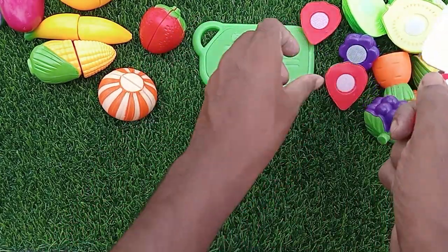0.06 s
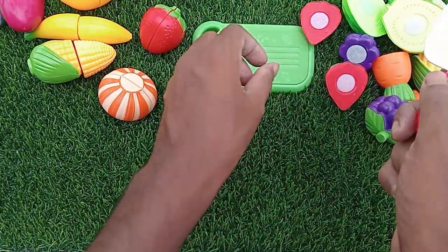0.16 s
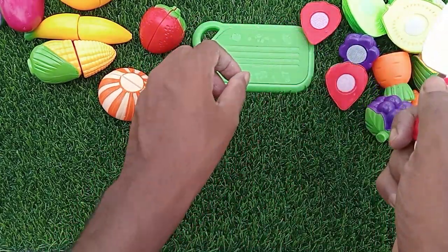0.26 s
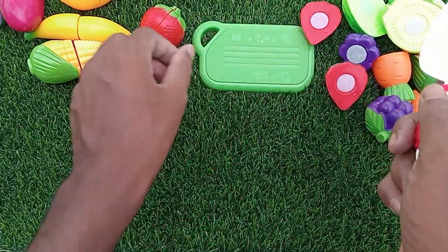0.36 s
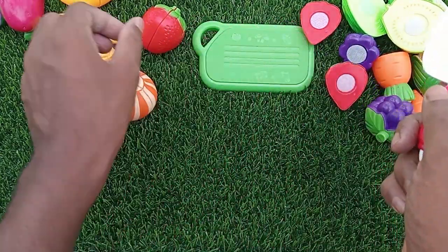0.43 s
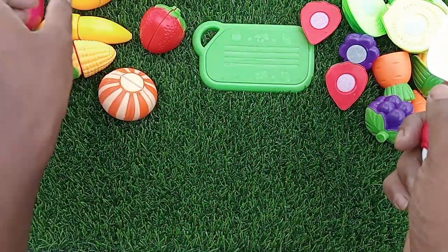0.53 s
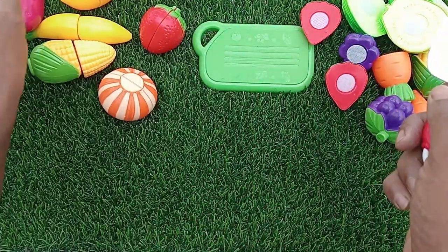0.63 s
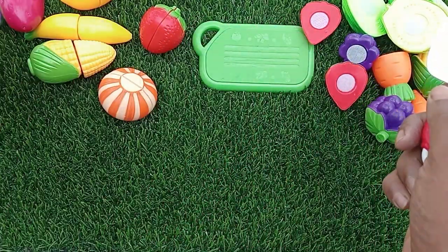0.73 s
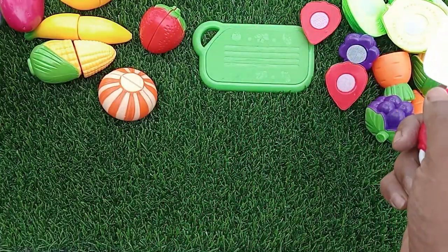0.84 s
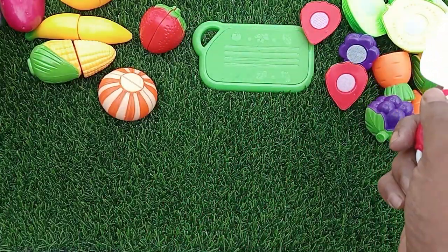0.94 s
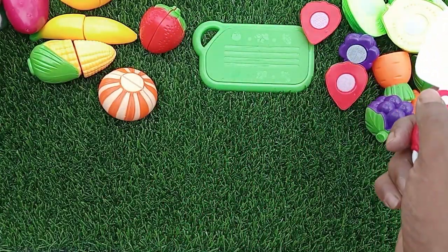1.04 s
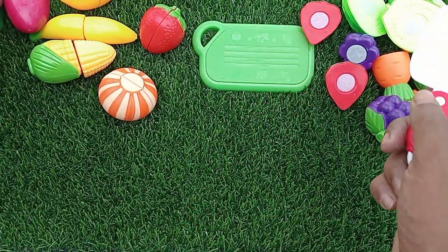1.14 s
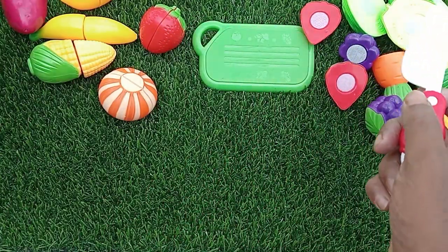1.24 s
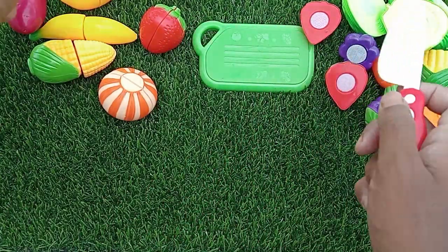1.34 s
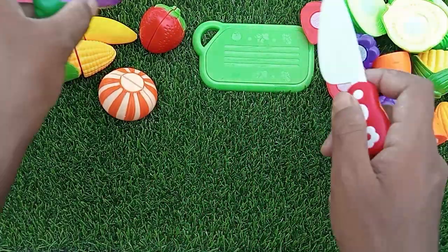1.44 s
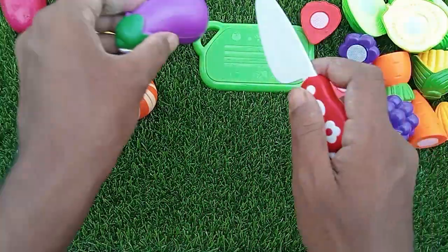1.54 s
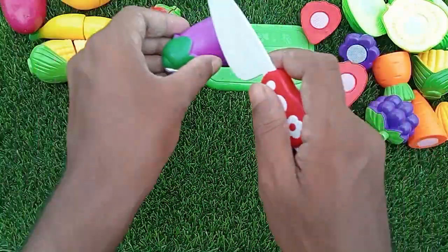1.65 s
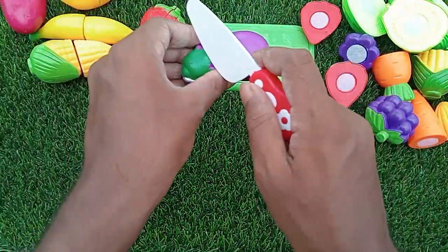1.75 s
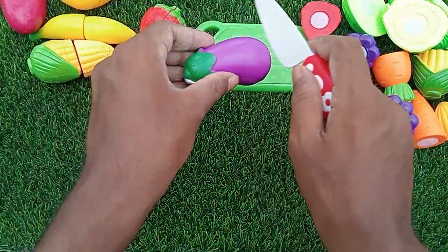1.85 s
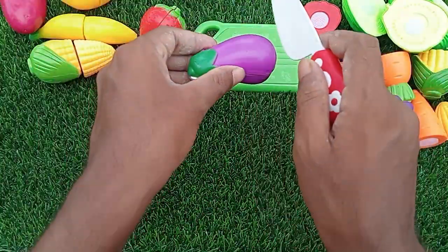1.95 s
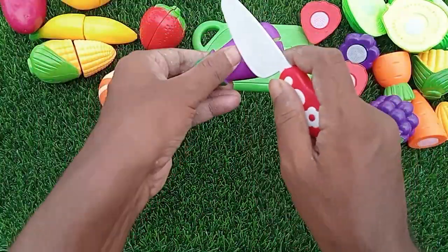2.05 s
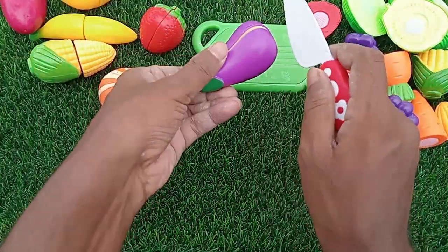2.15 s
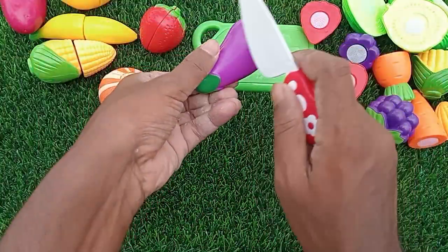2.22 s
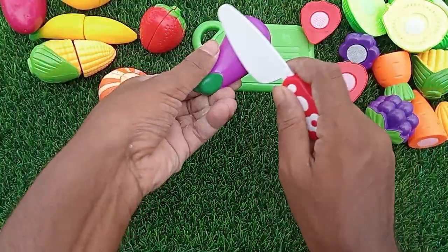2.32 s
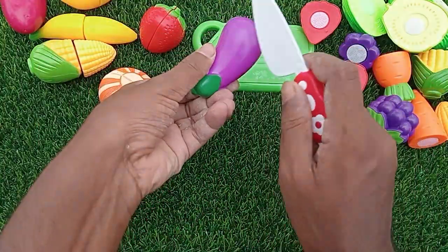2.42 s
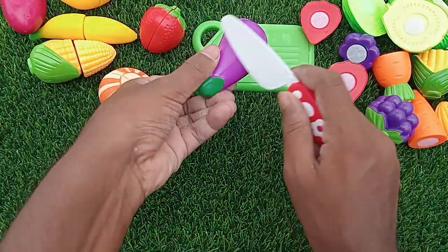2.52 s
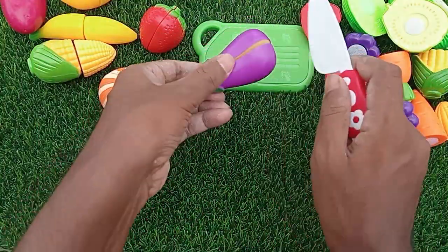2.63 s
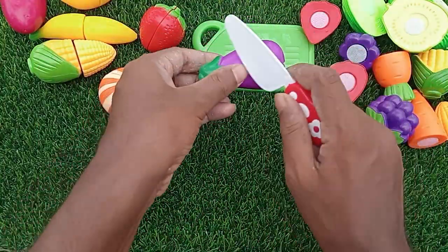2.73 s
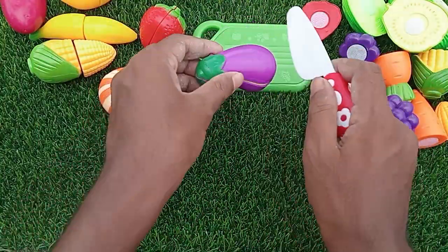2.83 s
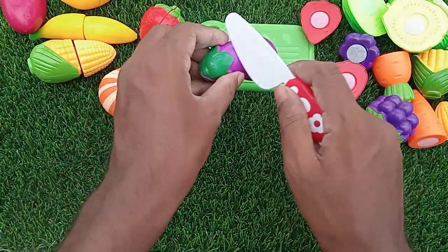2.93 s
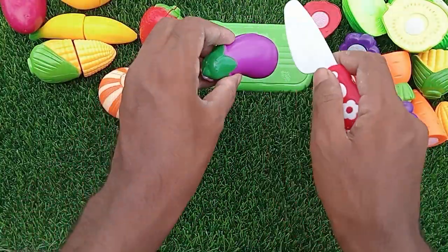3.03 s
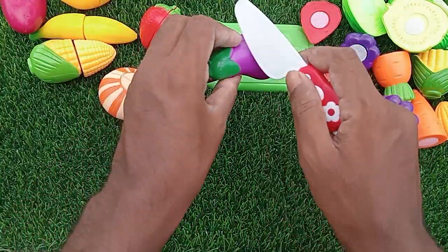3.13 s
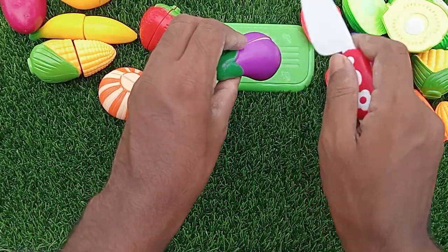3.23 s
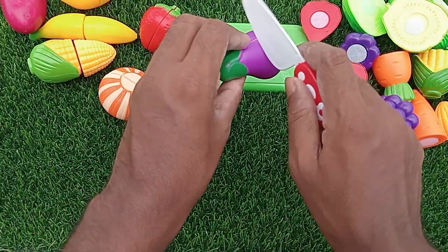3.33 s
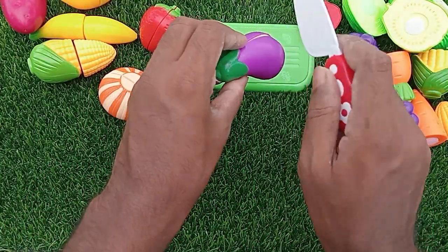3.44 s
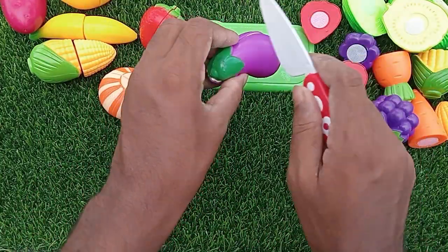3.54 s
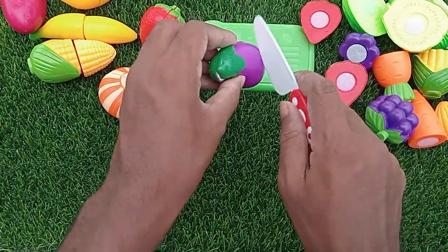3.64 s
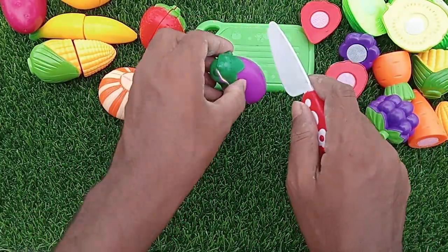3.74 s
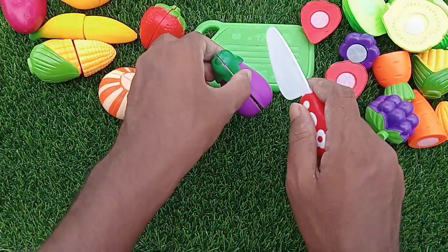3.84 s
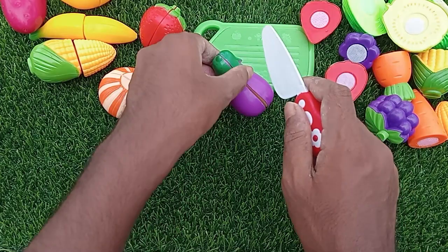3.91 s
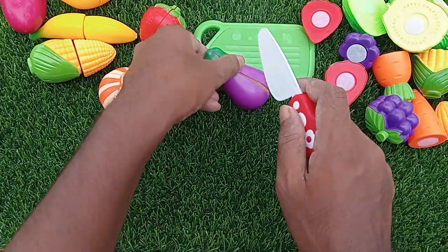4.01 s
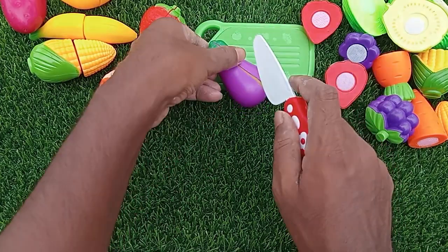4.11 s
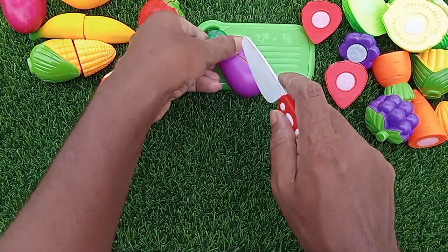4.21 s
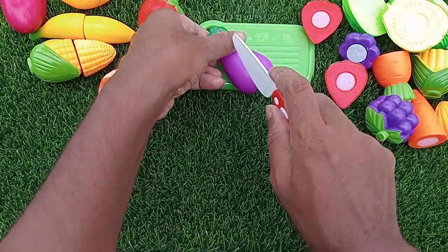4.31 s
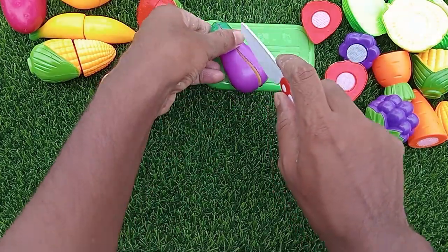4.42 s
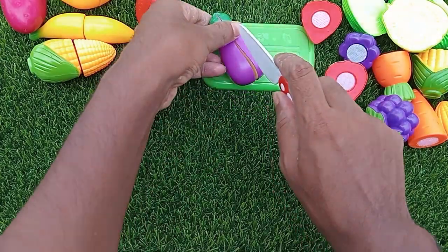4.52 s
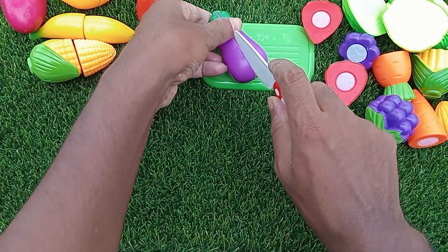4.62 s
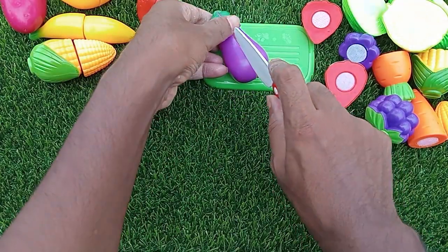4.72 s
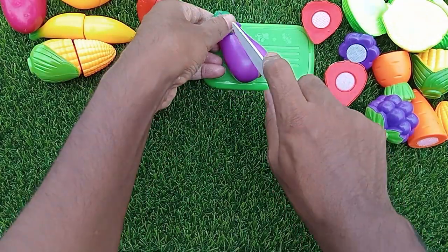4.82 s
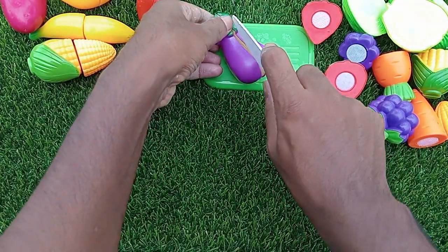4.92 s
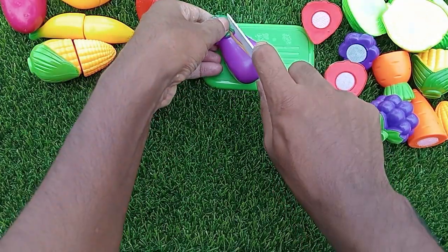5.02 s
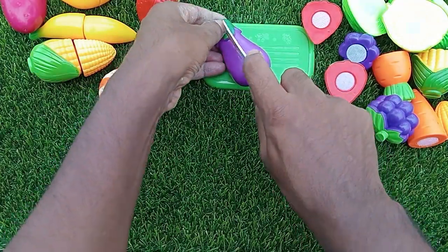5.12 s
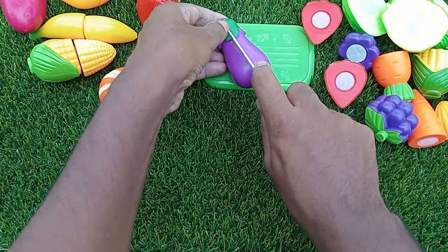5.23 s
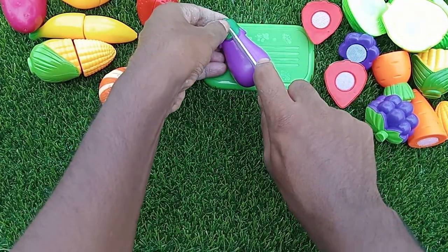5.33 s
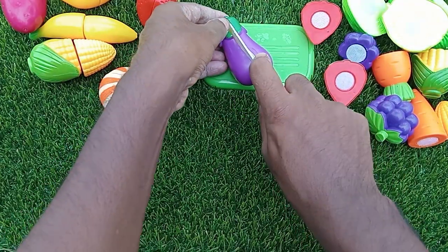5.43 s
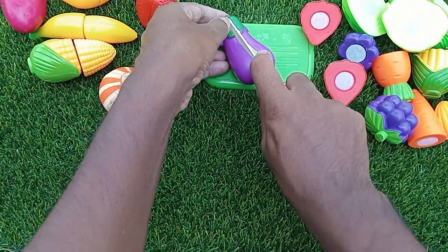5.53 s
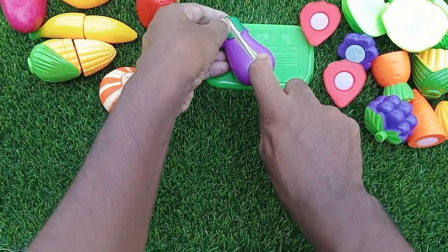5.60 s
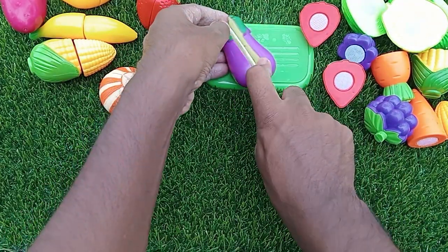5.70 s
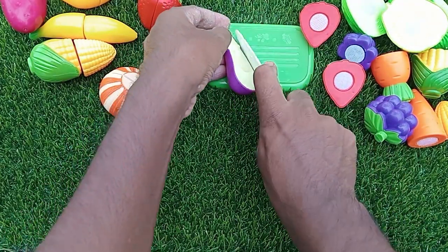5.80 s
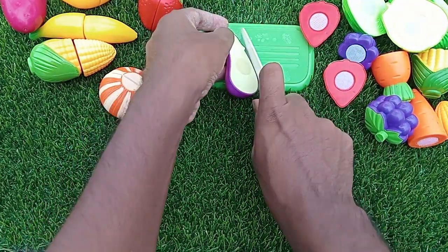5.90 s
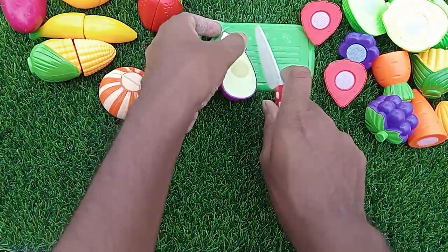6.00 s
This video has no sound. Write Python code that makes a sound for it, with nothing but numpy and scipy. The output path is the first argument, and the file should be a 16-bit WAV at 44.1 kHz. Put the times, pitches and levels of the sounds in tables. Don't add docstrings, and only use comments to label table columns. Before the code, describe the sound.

Outdoors, close to the microphone, a plastic knife taps a hollow toy eggplant: one early knock, a quiet gap, then spaced dry clicks with short scrapes. Three harder hollow taps follow, then light fingering. Finally the hook-and-loop joint rips in a dense crackle, ending in hollow knocks. Wind buffets the microphone over soft neighbourhood hiss, with faint chirps and a late dove coo.

```python
import sys
import numpy as np
from scipy import signal
from scipy.io import wavfile

SR = 44100
rng = np.random.default_rng(int(sys.argv[2]) if len(sys.argv) > 2 else 0)


def file_out(sig):
    cols = np.atleast_2d(sig).T
    lim = np.clip(cols, -1, 1)
    pcm = np.round(lim * 32767).astype(np.int16)
    wavfile.write(sys.argv[1], SR, pcm)


def gain_from_decibels(decibels):
    exponent = np.asarray(decibels, float) / 20
    return 10 ** exponent


N = 267246

# (t/s, shell level/dB, cavity level/dB re shell, tick level/dB re shell, shell f/Hz)
HELD_TAPS = [(1.82, -33, -31, -15, 2830), (1.8547, -50, -17, -1, 3080), (1.8581, -21.5, -13.5, -16.5, 2970),
             (2.1397, -34, -13, 1.5, 3570), (2.3521, -26, -44, -13, 3230), (2.5624, -24, -13.5, -10, 3400),
             (2.7863, -45.5, -8, -8, 3360), (2.811, -29.5, -5.5, -5, 3500), (2.9804, -25, -5, -12, 3830),
             (3.0162, -53.5, -8, -1, 3880), (3.2139, -29.5, -4, -8, 3270), (4.9262, -31, -10.5, -7, 3770),
             (5.3706, -32.5, -10, -9.5, 3690), (5.4, -35.5, -14, -11, 3640)]
RINGING_TAPS = [
    (0.0874, -35.5, -0.5, -15.5, 4050),
    (0.1291, -51, -0.5, -5.5, 3650),
    (3.4083, -17, -5, -10, 3900),
    (3.5702, -16, -3.5, -13, 3580),
    (3.6886, -15, 1.5, -7.5, 3610),
    (5.7706, -26, -3.5, -12.5, 3560),
    (5.7731, -24.5, -1.5, -8.5, 3220),
    (5.7991, -29.5, 2.5, -11, 4320),
]
# (t/s, shell level/dB, shell f/Hz, cavity level/dB re shell, contact/ms)
TOUCHES = [(0.632, -59.5, 3800, -23, 6.7), (1.051, -67, 2530, 9.5, 6.4), (1.218, -59, 3710, -5, 8.6),
           (4.0498, -42.5, 3100, 6.5, 2.4), (4.5232, -53.5, 4270, -13, 2.4), (4.5758, -52, 2410, -5, 7.3),
           (4.628, -55, 2950, -8, 5), (4.6768, -52, 2900, -1, 0.4), (4.937, -50, 3450, -23, 2.1),
           (4.949, -59, 4080, -15, 7.8), (4.9635, -54, 4220, -10, 2.9), (4.9816, -51, 4300, -14, 2),
           (5.065, -49.5, 4130, -6, 4.4), (5.14, -47, 3120, 1, 0.75), (5.178, -52, 2820, 6, 3.1),
           (5.243, -44.5, 2560, -5, 1.8), (5.246, -35, 2600, -8, 6.4), (5.7508, -39.5, 3650, -7, 1.5),
           (5.783, -29, 2980, 6, 1.26), (5.7892, -29, 3730, 5.5, 2.1), (5.8418, -45.5, 4530, -2.5, 1.6),
           (5.9812, -59.5, 2740, 9, 5.7), (6.0165, -51, 3220, -5, 8.1), (6.0324, -57, 2630, 18, 0.51)]
# (t/s, shell level/dB, shell f/Hz, contact/ms)
HOOK_BUNCHES = [(5.419, -31.5, 3730, 0.44), (5.4254, -27, 4110, 1.6), (5.438, -39, 3680, 0.99),
                (5.4473, -37, 3800, 1.4), (5.4519, -31.5, 3400, 0.81), (5.462, -26, 3330, 0.85),
                (5.482, -32, 3400, 1), (5.4908, -30, 2960, 1.5), (5.5192, -35, 4090, 0.74),
                (5.5269, -24, 3760, 1.5), (5.5579, -35.5, 3520, 1.4), (5.5646, -27, 4400, 2.9),
                (5.5699, -33, 3370, 3), (5.5817, -27.5, 3860, 1.2), (5.5885, -40, 3420, 1.8),
                (5.5912, -25, 3500, 2.5), (5.599, -27.5, 3300, 1.9), (5.6048, -33.5, 3500, 1.8),
                (5.6128, -32, 3350, 0.8), (5.6168, -28, 3970, 0.61), (5.6236, -25.5, 4260, 2.9),
                (5.6408, -24.5, 3750, 3.2), (5.6483, -21, 3970, 1.3), (5.662, -34, 4250, 3.3),
                (5.67, -25.5, 3400, 3.9), (5.6806, -31, 3630, 0.86), (5.6839, -24, 3310, 2.8),
                (5.6947, -20.5, 2960, 3.5), (5.7287, -37, 3410, 1.5), (5.733, -19, 3270, 3)]

# (f/Hz, level/dB)
TAP_THUD = [(520, -25.5), (780, -9.5), (1000, 10.5), (1240, 11.5), (1480, -5)]
# (f/Hz, level/dB)
JUMPING_THUD = [(300, -30), (480, -11), (700, -4), (1000, -3), (1240, 6.5), (1480, 4.5)]
# (f/Hz, level/dB)
PRESSED_THUD = [(260, 7), (480, -10), (800, 5.5), (1200, 10.5)]
# (f/Hz, level/dB)
HOLLOW = [(1620, -50), (1930, 13), (2200, -5)]
# (f/Hz, level/dB)
DAMPED_HOLLOW = [(1480, -39), (1730, 3), (2000, 4.5), (2250, -7)]
# (f/Hz, level/dB)
STRUCK_SHELL = [(2520, -65), (2780, 14), (3300, 5.5), (3700, 10), (3950, 9.5), (4380, 7.5), (4800, -44),
                (5200, -30)]
# (f/Hz, level/dB)
TORN_SHELL = [(2540, 9), (2960, 3), (3350, 3), (3760, -16), (4300, 6.5), (4790, 4.5), (5200, -18)]
# (f/Hz, level/dB)
BRIGHT_TICK = [(5820, -10), (6350, -3.5), (7100, 3.5), (7700, -9.5), (8300, 2.5), (9100, 4), (9800, -10.5),
               (10400, -7.5), (11100, -10.5), (11900, -11), (12700, -9), (13500, -27), (14300, -3),
               (15100, -8)]
# (low f/Hz, high f/Hz)
RADIATED_BANDS = [(180, 1700), (1300, 2400), (2350, 6000), (5200, 17000)]
# (thud t/s, cavity t/s, shell t/s, tick t/s)
RINGING_T60 = (.013, .021, .009, .006)
# (thud t/s, cavity t/s, shell t/s, tick t/s)
DAMPED_T60 = (.014, .011, .009, .006)

# (start t/s, end t/s, level/dB, brightness level/dB)
STROKES = [(1.018, 1.133, -64, 1), (1.87, 1.917, -48.5, 2.5), (2.148, 2.193, -51, 3),
           (2.366, 2.442, -52.5, -2), (2.592, 2.619, -52, 3.5), (2.803, 2.854, -49, 0.5),
           (3.016, 3.05, -44.5, 0), (3.23, 3.251, -50.5, 5), (3.43, 3.469, -57, -1),
           (3.59, 3.635, -59, -10), (3.70, 3.755, -52, -0.5), (5.427, 5.727, -49.5, -3),
           (5.77, 5.812, -38, -5), (5.986, 6.032, -57, 11.5)]
# (f/Hz, width f/Hz, level/dB)
STROKE_BODY = [(1440, 500, -6), (2770, 710, -3.5), (3850, 770, -1), (6170, 1200, -12)]
# (f/Hz, width f/Hz, level/dB)
STROKE_HISS = [(8720, 550, -0.5), (11200, 1500, -11.5), (14600, 2400, -12)]

# (t/s, level/dB)
STEADY_BREEZE = [(0.0, -69), (0.7, -55), (1.5, -58), (2.3, -58), (2.5, -59.5), (3.3, -60.5), (3.6, -67),
                 (4.5, -60), (5.0, -62.5), (6.06, -60.5)]
# (centre t/s, half length t/s, level/dB)
GUST_SWELLS = [(0.0, 0.025, -29.5), (0.13, 0.04, -47.5), (0.306, 0.12, -37), (0.47, 0.027, -38),
               (0.599, 0.031, -43.5), (0.888, 0.038, -43), (1.038, 0.039, -55), (1.275, 0.012, -48),
               (1.345, 0.014, -43.5), (1.528, 0.027, -40.5), (1.641, 0.054, -43), (1.92, 0.14, -51.5),
               (2.098, 0.039, -54), (2.282, 0.063, -44), (2.844, 0.026, -49.5), (3.1, .06, -52),
               (3.245, .06, -46), (3.603, 0.062, -56.5), (3.906, 0.024, -45), (4.03, 0.037, -50.5),
               (4.656, 0.015, -30), (4.712, 0.03, -32.5), (4.75, .04, -43), (5.153, 0.034, -44.5),
               (5.433, 0.039, -48.5), (5.531, 0.01, -44), (5.813, 0.044, -51), (6.04, .04, -61)]
# (f/Hz, level/dB per Hz)
BUFFET_TONE = [(15, -36), (25, -15), (58, -1.5), (81, 1.5), (156, -11.5), (295, -28.5), (343, -33),
               (375, -52), (500, -37), (650, -40), (1100, -120)]
# (start t/s, length t/s, start f/Hz, end f/Hz, level/dB)
BIRD_NOTES = [
    (.2, 0.026, 4300, 4300, -59),
    (0.248, .05, 4360, 4360, -65),
    (0.246, 0.054, 3540, 2980, -53),
    (0.334, 0.021, 2520, 2640, -59),
    (.71, 0.023, 4540, 4600, -59),
    (0.751, 0.026, 3770, 3920, -53.5),
]
# (t/s, f/Hz, level/dB)
DOVE_COO = [
    (5.88, 572, -72),
    (5.984, 688, -55),
    (6.032, 685, -53.5),
    (6.06, 700, -56),
]
# (t/s, level/dB)
HISS_SWELL = [(0.0, -56.5), (2.0, -56), (2.9, -55.5), (3.7, -57.5), (5.1, -55)]
# (f/Hz, level/dB per Hz)
HISS_TONE = [(60, 9), (110, 16.5), (200, 10.5), (500, 8.5), (1300, 1), (4200, -2), (4850, -11), (7600, -14),
             (8400, -17.5), (9200, -13), (9900, -24), (12300, -27), (15400, -38), (16500, -20)]


def rms_one(x):
    return x / np.sqrt(np.mean(x ** 2, axis=-1, keepdims=True) + 1e-20)


def drift(rate):
    r = np.exp(-2 * np.pi * rate / SR)
    wander = signal.lfilter([1], [1, -2 * r, r * r], rng.standard_normal(N + SR))
    return rms_one(wander[SR:])


def ring(force, hz, t60):
    r, w = gain_from_decibels(-60 / (t60 * SR)), 2 * np.pi * hz / SR
    return signal.lfilter([0, np.sin(w)], [1, -2 * r * np.cos(w), r * r], force + 1e-18)


def knocks(at, levels_db, centre_hz, contact_ms, body, t60s, chatter, focus_db, tail_db, tail_ms):
    length = 2048
    ms = np.arange(length) / SR * 1000
    grip = np.exp(-(ms / np.reshape(contact_ms, (-1, 1))) ** 2) * (1 - np.exp(-ms / 0.18))
    grip = grip + gain_from_decibels(tail_db) * np.exp(-ms / tail_ms)
    knock = 0
    for part, (modes, t60, band, part_db) in enumerate(zip(body, t60s, RADIATED_BANDS, levels_db)):
        clicks = rng.standard_normal((len(at), length))
        force = grip * np.sign(clicks) * np.abs(clicks) ** chatter
        hz, mode_db = np.transpose(modes)
        strength_db = mode_db + 2.5 * rng.standard_normal((len(at), len(modes)))
        if part == 2:
            strength_db -= focus_db * np.log2(hz / np.reshape(centre_hz, (-1, 1))) ** 2
        sound = sum(gain_from_decibels(strength_db[:, [k]]) * ring(force, hz[k], t60) for k in range(len(modes)))
        sound = signal.sosfilt(signal.butter(2, band, "band", fs=SR, output="sos"), sound)
        knock = knock + rms_one(sound) * gain_from_decibels(part_db)[:, None] * np.sqrt(.01 * SR / length)
    out = np.zeros(N + length)
    for s, one in zip(at, knock):
        start = round(s * SR)
        out[start:start + length] += one
    return out[:N]


def resonances(x, peaks):
    out = 0
    for k, (hz, width, level_db) in enumerate(peaks):
        r = np.exp(-np.pi * width / SR)
        poles = [1, -2 * r * np.cos(2 * np.pi * hz / SR), r * r]
        peak = signal.lfilter([(1 - r * r) / 2, 0, (r * r - 1) / 2], poles, x)
        out = out + (-1) ** k * gain_from_decibels(level_db) * peak
    return out


def coloured_noise(spectrum, patchy_db, rate, count):
    hz, level_db = np.transpose(spectrum)
    edges = hz[0] * 2 ** np.arange(0, np.log2(hz[-1] / hz[0]), 1 / count)
    white, out = rng.standard_normal((2, N)), 0
    flicker = drift(rate)
    for k, (low, high) in enumerate(zip(edges, edges[1:])):
        band = signal.sosfilt(signal.butter(2, [low, high], "band", fs=SR, output="sos"), white[k % 2])
        centre_db = np.interp(np.log(low * high) / 2, np.log(hz), level_db)
        out = out + gain_from_decibels(centre_db + patchy_db * np.roll(flicker, k * N // 61)) * band
    return rms_one(out)


def glide(note):
    t, (s, hz, level_db) = np.arange(N) / SR, np.transpose(note)
    edge = np.interp(t, [s[0] - .008, s[0], s[-1], s[-1] + 0.016], [0, 1, 1, 0])
    phase = 2 * np.pi * np.cumsum(np.interp(t, s, hz)) / SR
    return edge * gain_from_decibels(np.interp(t, s, level_db)) * np.exp(1j * phase)


def taps():
    at, shell, cavity, tick, centre_hz = np.transpose(HELD_TAPS)
    thud_db = -17.5 + 0 * at
    return knocks(at, shell + [thud_db, cavity, 0 * at, tick], centre_hz, 2.1,
                  (TAP_THUD, HOLLOW, STRUCK_SHELL, BRIGHT_TICK), DAMPED_T60,
                  chatter=1.82, focus_db=104.0, tail_db=-16.5, tail_ms=4.6)


def free_taps():
    at, shell, cavity, tick, centre_hz = np.transpose(RINGING_TAPS)
    thud_db = -14 + 0 * at
    return knocks(at, shell + [thud_db, cavity, 0 * at, tick], centre_hz, 3.5,
                  (JUMPING_THUD, HOLLOW, STRUCK_SHELL, BRIGHT_TICK), RINGING_T60,
                  chatter=1.88, focus_db=61.0, tail_db=-12.5, tail_ms=3.8)


def snaps():
    at, shell, centre_hz, contact_ms = np.transpose(HOOK_BUNCHES)
    middling = shell.mean()
    scatter_db = 1.6 * rng.standard_normal((len(at), 3)).T
    thud, cavity, tick = middling + 0.96 * (shell - middling) + scatter_db
    return knocks(at, [thud - 14.5, cavity - 17.5, shell, tick - 11], centre_hz, 1.58 * contact_ms,
                  (PRESSED_THUD, DAMPED_HOLLOW, TORN_SHELL, BRIGHT_TICK), DAMPED_T60,
                  chatter=2.0, focus_db=15.0, tail_db=-15.5, tail_ms=6.2)


def handling():
    at, shell, centre_hz, cavity, contact_ms = np.transpose(TOUCHES)
    tick_db = -14 + 0 * at
    return knocks(at, shell + [cavity - 5.5, cavity, 0 * at, tick_db], centre_hz, 1.7 * contact_ms,
                  (PRESSED_THUD, DAMPED_HOLLOW, TORN_SHELL, BRIGHT_TICK), DAMPED_T60,
                  chatter=3.66, focus_db=31.0, tail_db=-16.5, tail_ms=10.5)


def slides():
    t = np.arange(N) / SR
    grain_db = 2 * np.minimum(rng.exponential(1, N), 5) + 2.5 * drift(90)
    grains = rng.standard_normal(N) * gain_from_decibels(grain_db)
    low = rms_one(resonances(grains, STROKE_BODY))
    high = rms_one(resonances(grains, STROKE_HISS))
    out = np.zeros(N)
    for start, end, level_db, bright_db in STROKES:
        times = [start - .004, start + 0.0033, end - .004, end + 0.0045]
        stroke = np.interp(t, times, [0.0091, 0.44, 0.59, 0.012])
        out += gain_from_decibels(level_db) * stroke * (low + gain_from_decibels(bright_db - 8.0) * high)
    return out


def breeze():
    t, (s, level_db) = np.arange(N) / SR, np.transpose(STEADY_BREEZE)
    edge = 1.5
    gusts = sum(gain_from_decibels(db) * np.exp(-np.abs((t - at) / half) ** edge) for at, half, db in GUST_SWELLS)
    steady = gain_from_decibels(np.interp(t, s, level_db))
    return (steady + gusts) * coloured_noise(BUFFET_TONE, patchy_db=3.0, rate=11.6, count=3)


def birds():
    blur = .8 + .55 * (drift(110) + 1j * drift(110))
    swell_db = 8.5
    chirps = 0
    for s, d, a, b, db in BIRD_NOTES:
        chirps = chirps + glide([(s, a, db - swell_db), (s + d / 2, (a + b) / 2, db), (s + d, b, db - swell_db)])
    chirps = np.real(blur * chirps)
    scatter = rng.standard_normal(6000) * np.exp(-np.arange(6000) / 1800)
    echoes = gain_from_decibels(-29) * signal.fftconvolve(chirps, scatter)[:N]
    dove = np.sqrt(2) * np.real(glide(DOVE_COO))
    return chirps + echoes + dove


def surroundings():
    s, level_db = np.transpose(HISS_SWELL)
    swell = gain_from_decibels(np.interp(np.arange(N) / SR, s, level_db) + 1.0)
    return swell * coloured_noise(HISS_TONE, patchy_db=2.0, rate=8.6, count=6)


def scene():
    toy = taps() + free_taps() + snaps() + handling() + slides()
    air = breeze() + birds() + surroundings()
    return (toy + air)[None]


def low_pass(x):
    return signal.sosfilt(signal.butter(12, 16830, fs=SR, output="sos"), x)


def record(dry):
    x = signal.sosfilt(signal.butter(3, 50, "high", fs=SR, output="sos"), dry)
    x = signal.sosfilt(signal.ellip(8, .5, 42, 15550, fs=SR, output="sos"), x)
    return low_pass(np.clip(x, -1, 1))


dry = scene()
out = record(dry)
file_out(out)
```